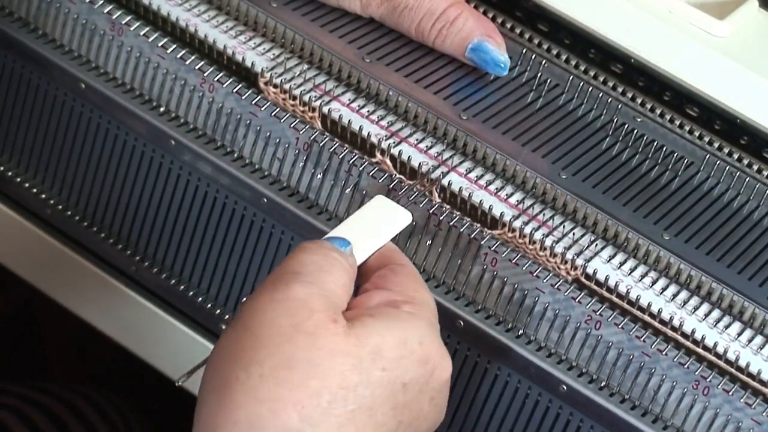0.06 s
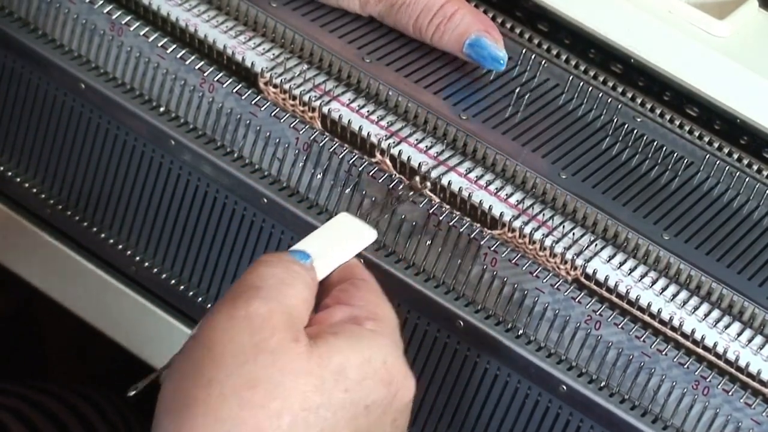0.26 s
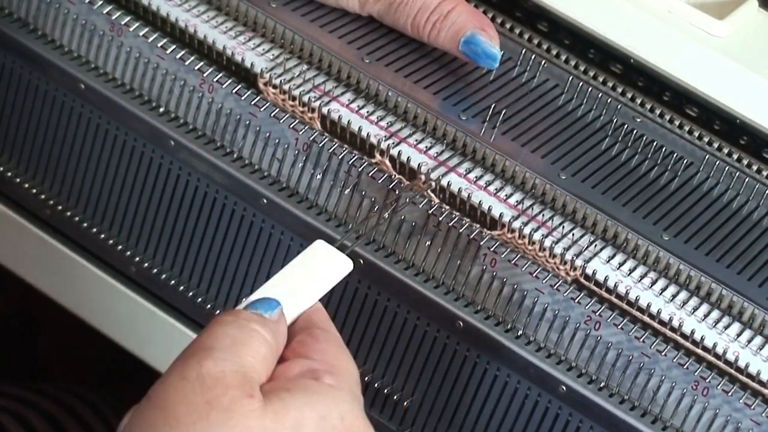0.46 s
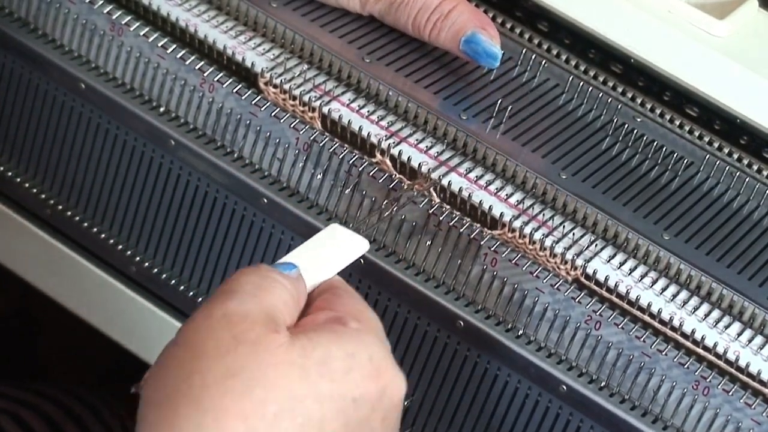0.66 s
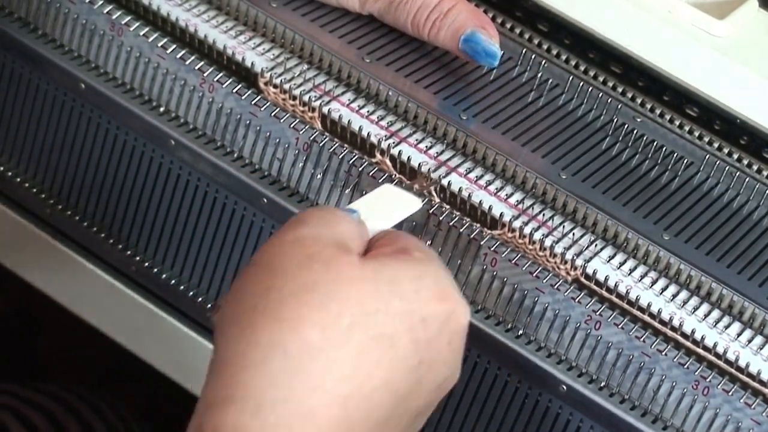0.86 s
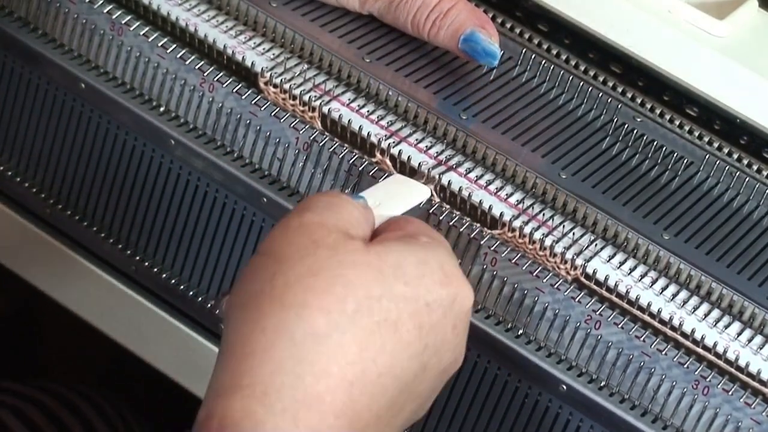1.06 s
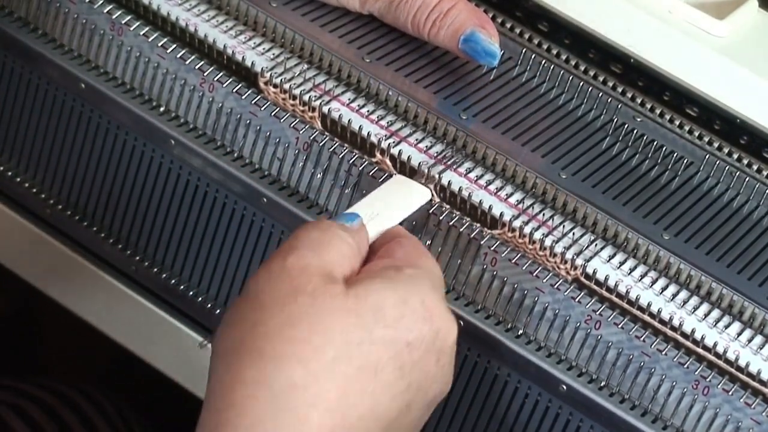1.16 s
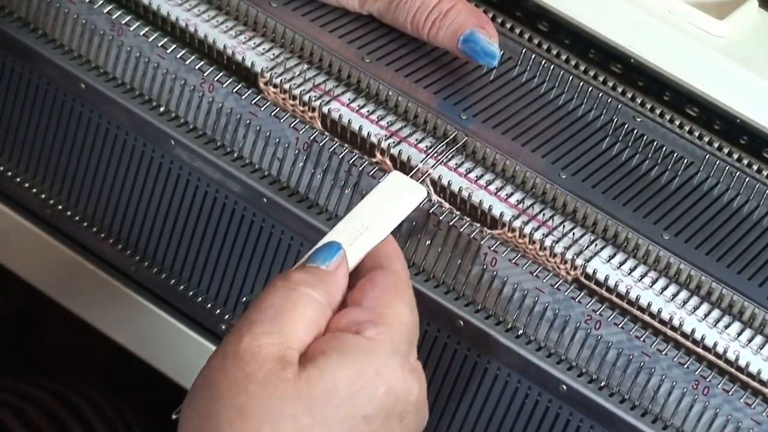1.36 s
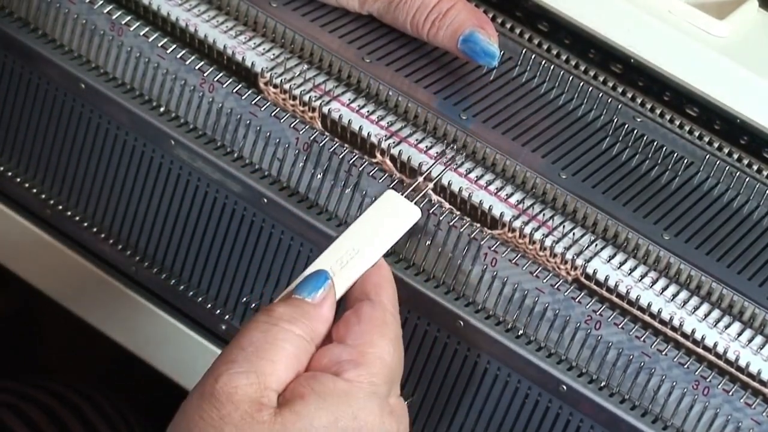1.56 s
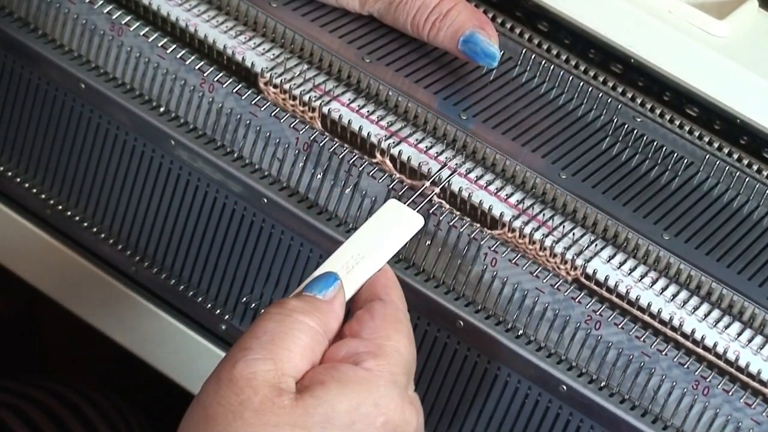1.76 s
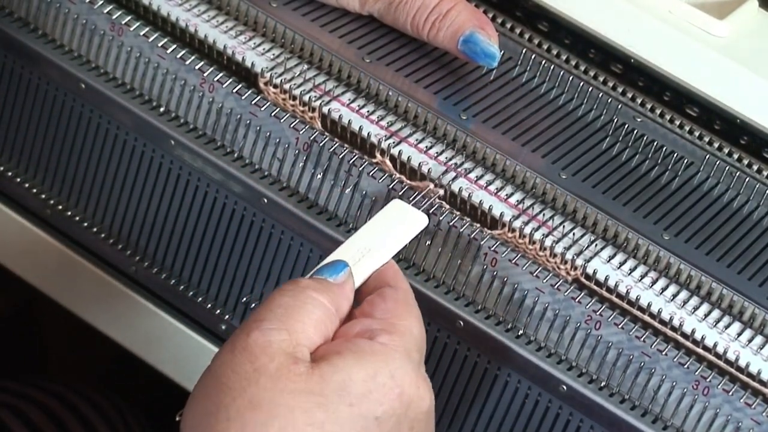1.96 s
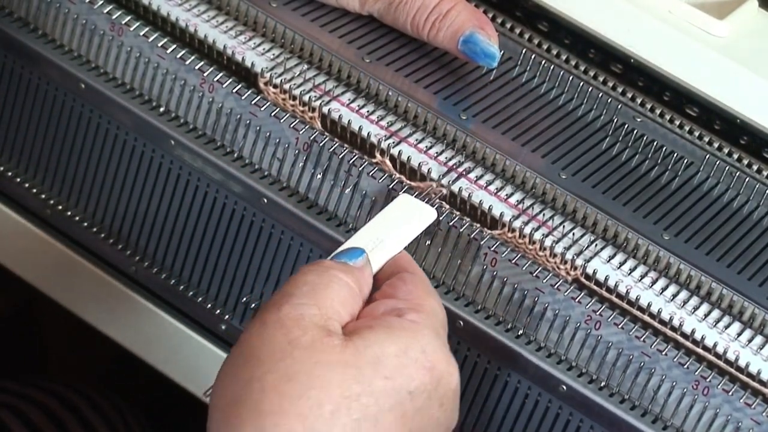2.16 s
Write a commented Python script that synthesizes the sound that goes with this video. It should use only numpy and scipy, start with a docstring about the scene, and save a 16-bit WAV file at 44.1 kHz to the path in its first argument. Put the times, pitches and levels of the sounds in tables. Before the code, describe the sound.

Light, sharp metallic clicks of a hand tool against knitting machine needles, close, in a quiet room

```python
"""A steady mains hum, soft room noise and a faint treble rustle run throughout: a sine and shaped noise.
From 0.11 s a steel transfer tool and latch needles click and rattle on the bed of a knitting machine,
close to a small stereo microphone, densest up to 1.2 s, then a few sparse contacts to 2.12 s.
Each contact is a hail of tiny impacts that ring the needles, the tool and the bed; a small room answers."""
import sys
import numpy as np
from scipy import signal
from scipy.fft import rfft, irfft
from scipy.io import wavfile
from scipy.ndimage import uniform_filter1d

SR = 44100
rng = np.random.default_rng(int(sys.argv[2]) if len(sys.argv) > 2 else 0)


def file_out(sig):
    """Save sig as 16-bit WAV at sys.argv[1]."""
    # one column per channel
    cols = np.atleast_2d(sig).T
    # limit, then scale
    lim = np.clip(cols, -1, 1)
    pcm = np.round(lim * 32767).astype(np.int16)
    wavfile.write(sys.argv[1], SR, pcm)


N = 97020


def undb(db):
    """Amplitude factor of a level in dB."""
    return 10 ** (np.asarray(db) / 20)


def unit(x):
    """Scales to RMS 1."""
    return x / np.sqrt(np.mean(x ** 2))


def curve(table, hz):
    """Reads (f/Hz, value) points on a log-frequency axis."""
    table = np.array(table, float)
    return np.interp(np.log(hz), np.log(table[:, 0]), table[:, 1])


def band(x, lo_hz, hi_hz):
    """Butterworth band-pass."""
    sos = signal.butter(2, [lo_hz, min(hi_hz, .45 * SR)], "band", fs=SR, output="sos")
    return signal.sosfilt(sos, x)


def fade(t, t60):
    """Exponential decay, -60 dB at t60."""
    return np.exp(-np.log(1000) * t / t60)


def walk(rate_hz):
    """Random levels held 1 / rate_hz and slewed twice; spread near 1."""
    hold = int(SR / rate_hz)
    steps = np.repeat(rng.standard_normal(N // hold + 1), hold)
    return 1.53 * uniform_filter1d(uniform_filter1d(steps, hold), hold)[:N]


HUM_HZ, HUM_RMS_DB, HUM_WAVER_DB = 120, -56, 1


def hum():
    """A mains hum: one sine at twice the line frequency, its level wavering slightly."""
    level = np.sqrt(2) * undb(HUM_RMS_DB + HUM_WAVER_DB * walk(5.82))
    return level * np.sin(2 * np.pi * HUM_HZ * np.arange(N) / SR)


# Room noise spectrum, relative: f/Hz, density/dB per Hz
AIR_SPECTRUM = [(20, -14), (60, -23.5), (90, -3), (150, -8.5), (210, -11), (300, -8.5), (390, -4.5),
                (520, -9), (900, -10.5), (1500, -14.5), (2500, -19.5), (5000, -26), (10000, -33),
                (16000, -30.5)]
# Stereo width of the room noise: f/Hz, side re mid/dB
AIR_WIDTH = [(30, -26), (120, -7), (300, -3.5), (1000, -1.5), (6000, -2.5), (10000, 0), (13000, -26)]
AIR_RMS_DB, AIR_FLICKER_DB = -55, .6


def air():
    """Soft room noise shaped in mid and side; each octave flickers faintly on its own."""
    hz = np.maximum(np.arange(N // 2 + 1) * SR / N, 1)
    mid_db = curve(AIR_SPECTRUM, hz)
    mid = rfft(rng.standard_normal(N)) * undb(mid_db)
    side = rfft(rng.standard_normal(N)) * undb(mid_db + curve(AIR_WIDTH, hz))
    stereo = np.array([mid + side, mid - side])
    out = 0
    for lo_hz in 20 * 2. ** np.arange(10):
        octave = irfft(stereo * ((hz >= lo_hz) & (hz < 2 * lo_hz)), N)
        out = out + undb(AIR_FLICKER_DB * walk(6.3)) * octave
    return undb(AIR_RMS_DB) * unit(out)


# Treble rustle, perhaps yarn sliding over the hooks: t/s, level/dB
RUSTLE_LEVEL = [(0, -76), (.1, -69), (.2, -76), (0.451, -73), (.6, -72), (.75, -64.5), (.82, -75),
                (1.05, -77), (1.198, -69), (1.398, -75.5), (2.2, -70.5)]
RUSTLE_BAND_HZ, RUSTLE_WAVER_DB = (2780, 12800), 1.5


def rustle():
    """A faint, slightly uneven treble hiss: band-passed noise."""
    db = np.interp(np.arange(N) / SR, *np.array(RUSTLE_LEVEL).T) + RUSTLE_WAVER_DB * walk(26)
    return undb(db) * unit(band(rng.standard_normal(N), *RUSTLE_BAND_HZ))


# Modes of bed, tool and needles: f/Hz before detuning, peak gain re clatter/dB before scatter and boost, t60/s
MODES = [(350, 4, .04), (660, 0, .04), (800, 0, .03), (1080, 2, .03), (1400, 2, .03), (1770, 0, .02),
         (2220, 0, .015), (3200, 4, .025), (3900, 0, .01), (4600, 0, .02), (5600, 0, .01), (6600, 4, .015),
         (7400, 0, .008), (8200, 2, .02), (10000, 0, .006), (11800, 3, .07), (13500, 0, .008)]
# Bands of bed thud, bed knock, tool, needles, latches: low f/Hz, high f/Hz
PART_BANDS = [(310, 720), (720, 2300), (2300, 5200), (5200, 9300), (9300, 14000)]
# The heavy bed answers late; same order of parts: lag/s
PART_LAGS = [.006, .0006, 0, 0, 0]
MODE_SCATTER_DB, MODE_DETUNE, FAVOUR_OCTAVES = 2, .01, .1
IMPACT_SCATTER_DB = 3.8
CHATTER_T60_S = .11  # loose neighbours chatter on after a contact


def contact(shares_db, rattle_ms, chatter_db, favoured_hz, boost_db):
    """A dying hail of impacts clatters through each part and rings its modes, most near favoured_hz."""
    t = np.arange(SR // 2) / SR
    chance = rng.standard_normal((len(MODES), 2))
    hail, loose, sizes = rng.standard_normal((3, len(t)))
    uneven = undb(IMPACT_SCATTER_DB * unit(uniform_filter1d(sizes, size=14)))
    blows = hail * uneven * np.exp(-(t * 1000 / max(rattle_ms, .5)) ** 2)
    chatter = loose * uneven * fade(t, CHATTER_T60_S)
    body = 0
    for k, share_db in enumerate(shares_db):
        lo_hz, hi_hz = PART_BANDS[k]
        clatter, rings = band(blows, lo_hz, hi_hz), 0
        for (hz, gain_db, t60), (gain_chance, pitch_chance) in zip(MODES, chance):
            if not lo_hz <= hz < hi_hz:
                continue
            close = max(np.exp(-(np.log2(hz / f) / FAVOUR_OCTAVES) ** 2) for f in favoured_hz)
            sine = np.sin(2 * np.pi * hz * (1 + MODE_DETUNE * pitch_chance) * t)
            ring = sine * fade(t, t60) * 2 * np.log(1000) / (t60 * SR)  # near unit gain at resonance
            gain = undb(gain_db + MODE_SCATTER_DB * gain_chance + boost_db * close)
            rings = rings + gain * signal.fftconvolve(clatter, ring)[:len(t)]
        part = np.array([clatter + undb(chatter_db) * band(chatter, lo_hz, hi_hz), rings])
        rms = np.sqrt(np.mean(part.sum(axis=0)[:SR // 100] ** 2))  # over the first 10 ms
        late = np.roll(part, int(PART_LAGS[k] * SR), axis=1)
        body = body + (-1) ** k * undb(share_db) * late / rms
    return body


# Contacts: t/s, level/dB before CLICK_TRIM_DB, shares of bed thud, bed knock, tool, needles, latches/dB,
# rattle length/ms (at least 0.5), after-chatter/dB, two favoured f/Hz, their boost/dB
CONTACTS = [(.114, -57, -17, -16, 1.5, -18, 0, 11, 7, 4400, 11700, 1.8),
            (0.2082, -24.5, -16, -11, -21, -20, -11, 2.5, -6, 1100, 8200, 13.6),
            (0.2096, -27.5, -12, -12, -7, -18, -7, 8, -1, 1350, 10000, 18),
            (0.2331, -16.5, -42, -25, -35, -13, -18.5, 5.3, -4, 8100, 13500, 8),
            (0.2389, -22.5, -39, -43, -19, -11.5, -9.5, 3.3, -18, 7400, 13500, 24),
            (0.2672, -36, -6, -5.5, -21, -12.5, -20, 3.8, -10, 660, 7400, 6),
            (0.3167, -2, -55, -35.5, -22, -23, -21, 3.6, -13, 3900, 7870, 26),
            (0.319, -11, -25, -26, -22, -10, -33, 7.8, -7.5, 5600, 1770, 10.2),
            (0.3353, -32, -8, -12.5, -18, -15, -30, 2.4, -5, 6600, 660, 8),
            (0.6240, -48, -37, -1, -5.5, -5, -1, 7, 1, 6600, 1100, 3),
            (0.6295, -40.5, -24, -11, -7, -10.5, -6.5, 11, -7, 11800, 1100, 22),
            (0.8242, -22, -32.5, -50, -22.5, -14.5, -7.5, 4.3, -4, 11800, 3200, 11),
            (0.8271, -19, -43, -28, -24, -13.5, -11.5, 0.96, -12.5, 6200, 8200, 16),
            (0.849, -35.5, -29, -13, -8, -22, -25, 8.4, 9, 8200, 3200, 6),
            (0.8652, -21, -27, -13, -13.5, -17, -23, 8.7, -6.5, 1400, 3200, 19),
            (.8700, -26.5, -24, -8.5, -22, -11, -23, 11, 10, 1100, 8200, 20),
            (0.891, -45, -33, -15, -4, -13, -25, 3.1, 4, 1350, 8200, 8),
            (0.9167, -30.5, -49, -50, -10.5, -3, -1, 1.6, -9, 10000, 6600, 13.5),
            (0.9182, -18, -29, -25, -14.5, -22, -15.5, 5.9, -6, 3270, 10300, 22.7),
            (0.927, -33, -6, -24, -8, -17, -27, 6, -24, 352, 4600, 18),
            (1.034, -49.5, -22, -21, -16, -15, -14, 4, -9, 11700, 5600, 3),
            (1.0796, -18.5, -27.5, -18.5, -34, -16, -16, 1.6, -8, 6600, 10600, 21),
            (1.0808, -20, -36, -31, -16.5, -8.5, -13.5, 7.3, -7, 8200, 2220, 17),
            (1.0870, -29, -20.5, -13.5, -15, -29, -37, 4, -6, 660, 4600, 23),
            (1.127, -55, -28, -13, -4, -22, 0, 5, -12, 4900, 7400, 3.8),
            (1.194, -66, -31.5, -20, -18, 0, 4.5, 3.3, -9, 10000, 8100, 15),
            (1.735, -46, -9, -27, -16, -9.5, -6, 1.5, -5, 5600, 4600, 9.9),
            (1.962, -51, -29, -24, -2.5, -13, -20, 6, -2, 3900, 3200, 9),
            (2.000, -47, 0, -35, -32, -35, -35, 1.7, -11, 350, 350, 19),
            (2.1245, -41.5, -15.5, -5.5, -22, -41, -30, 0.88, -16, 800, 2220, 15)]
CLICK_TRIM_DB = -5
LONG_RING_HZ, LONG_RING_DB, LONG_RING_T60_S = 4420, -68, .6  # one steel part rings on faintly


def clicks():
    """Every contact at its time and strength, as clatter and rings; all of them feed the long ring."""
    out = np.zeros((2, N + SR))
    for t_s, db, *shares_db, rattle_ms, chatter_db, first_hz, second_hz, boost_db in CONTACTS:
        i = int(t_s * SR)
        hit = contact(shares_db, rattle_ms, chatter_db, (first_hz, second_hz), boost_db)
        out[:, i:i + SR // 2] += undb(db + CLICK_TRIM_DB) * hit
    t = np.arange(N) / SR
    clatter, rings = out[:, :N]
    ring = np.sin(2 * np.pi * LONG_RING_HZ * t) * fade(t, LONG_RING_T60_S)
    return clatter, rings + undb(LONG_RING_DB) * signal.fftconvolve(clatter + rings, ring)[:N]


# Room decay: f/Hz, t60/s
ROOM_DECAY = [(300, 0.27), (1000, 0.29), (4000, 0.15), (8000, 0.18), (14000, 0.036)]
ROOM_DB, ROOM_SIDE_DB, ROOM_ONSET_S = -10, -3.5, .00073


def room(x):
    """Dense reflections that build up in about a millisecond and mostly die faster in the treble."""
    t = np.arange(SR // 2) / SR
    tail = 0
    for hz in 200 * 2 ** np.arange(0, 6.6, .5):
        noise = band(rng.standard_normal((2, len(t))), hz / 2 ** .25, hz * 2 ** .25)
        tail = tail + noise * fade(t, curve(ROOM_DECAY, hz))
    tail = tail * (1 - np.exp(-(t / ROOM_ONSET_S) ** 2))
    tail = undb(ROOM_DB) * tail / np.sqrt(np.sum(tail[0] ** 2))
    mid, side = (signal.fftconvolve(x, h)[:N] for h in tail)
    return mid + undb(ROOM_SIDE_DB) * side * np.array([[1], [-1]])


NEAR_PAN_DB = .6  # first channel over second
RINGS_TO_ROOM_DB = -9  # rings sent into the room, re clatter: the tail is mostly clatter


def scene():
    """Clicks and rustle sound near and excite the room; hum and air are added dry."""
    clatter, rings = clicks()
    clatter = clatter + rustle()
    near = (clatter + rings) * undb(np.array([[.5], [-.5]]) * NEAR_PAN_DB)
    return near + room(clatter + undb(RINGS_TO_ROOM_DB) * rings) + hum() + air()


TOP_HZ = 15800


def record(dry):
    """The microphone cuts the top: a steep elliptic low-pass."""
    return signal.sosfilt(signal.ellip(8, .2, 70, TOP_HZ, fs=SR, output="sos"), dry)


dry = scene()
out = record(dry)
file_out(out)
```